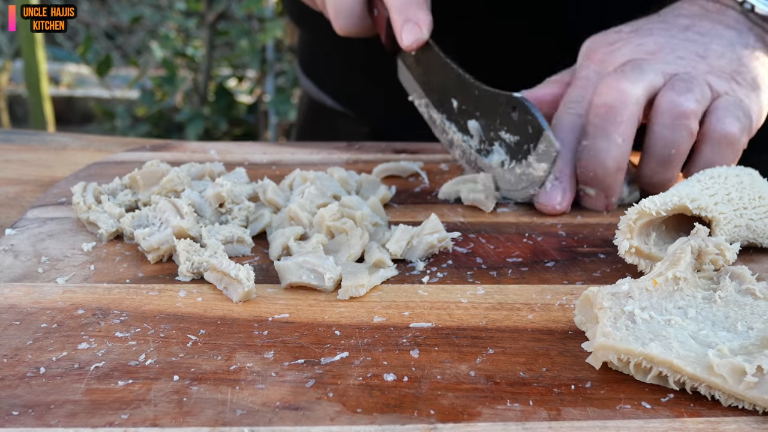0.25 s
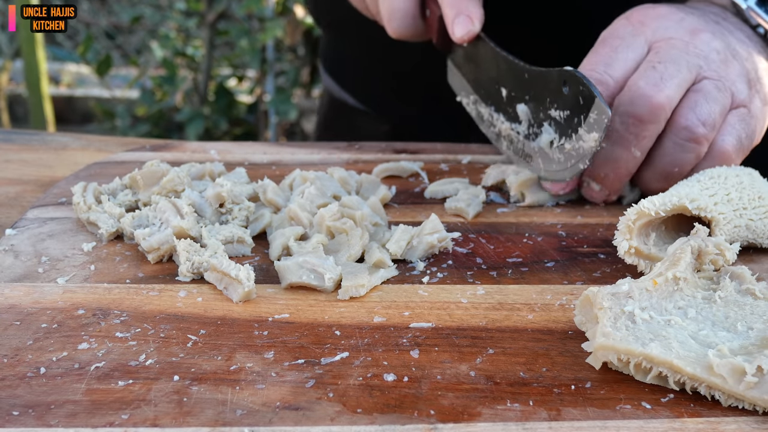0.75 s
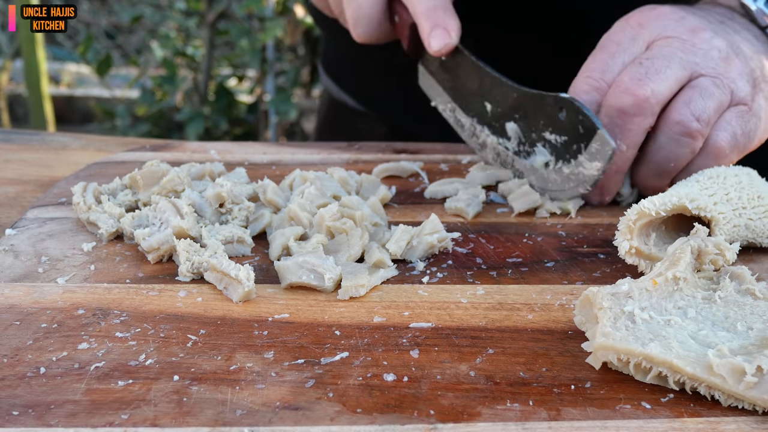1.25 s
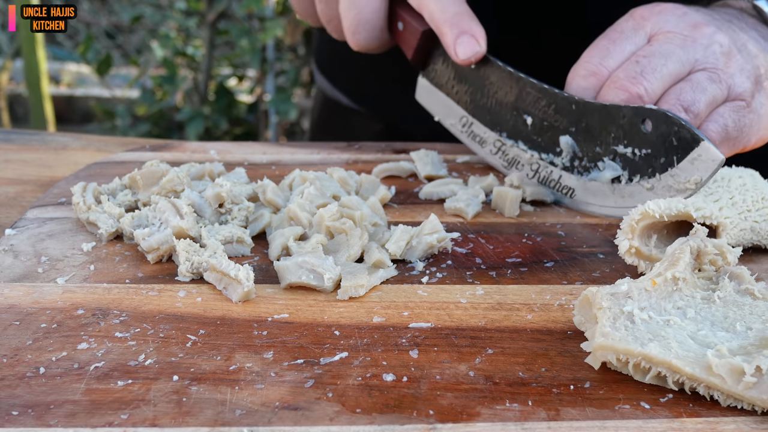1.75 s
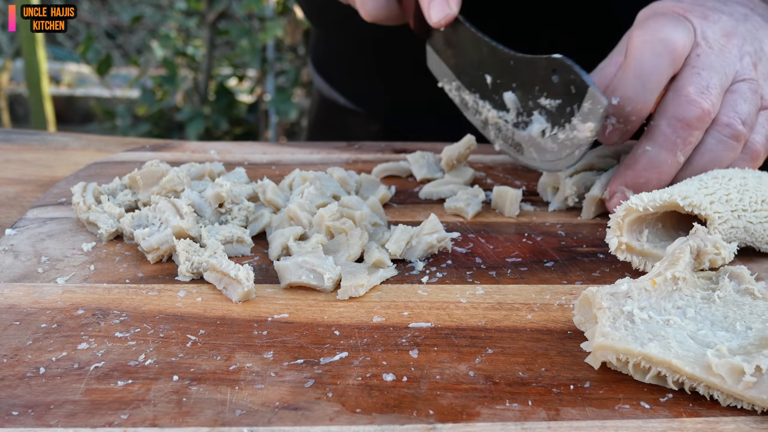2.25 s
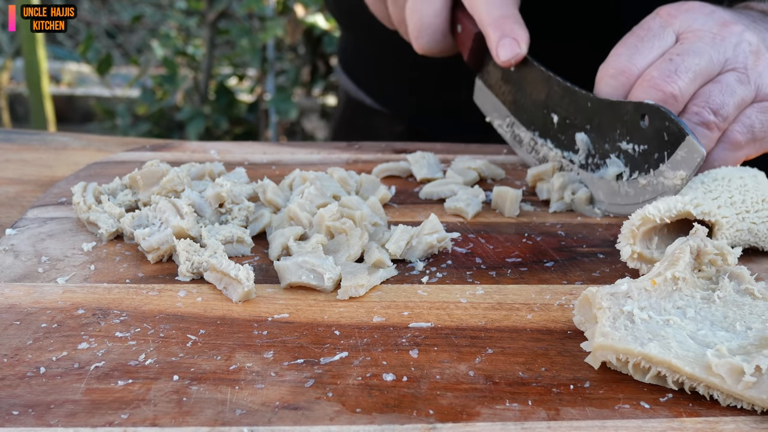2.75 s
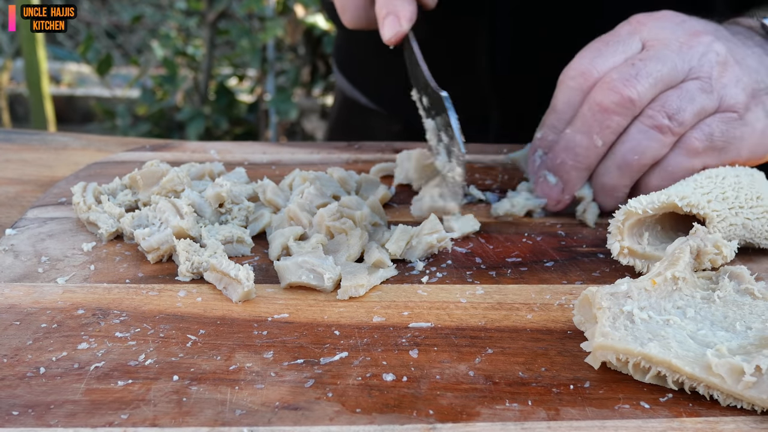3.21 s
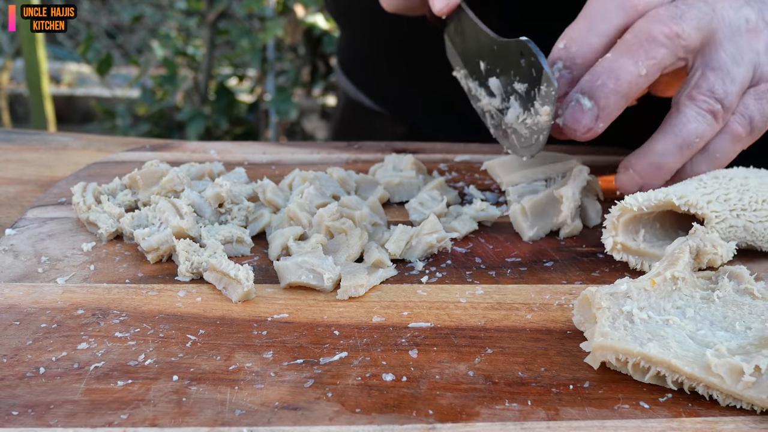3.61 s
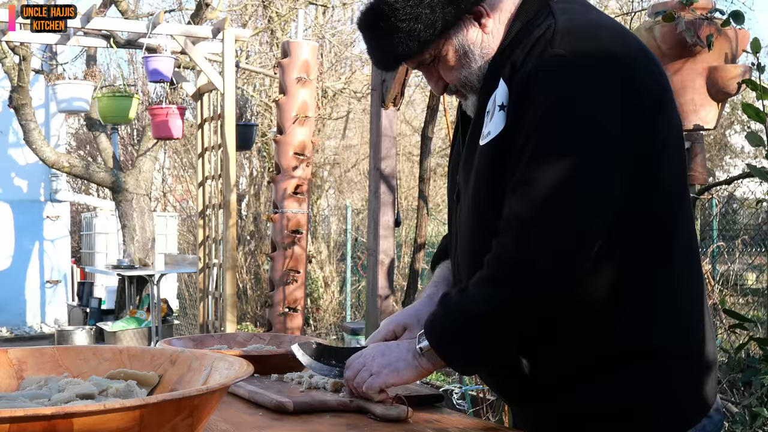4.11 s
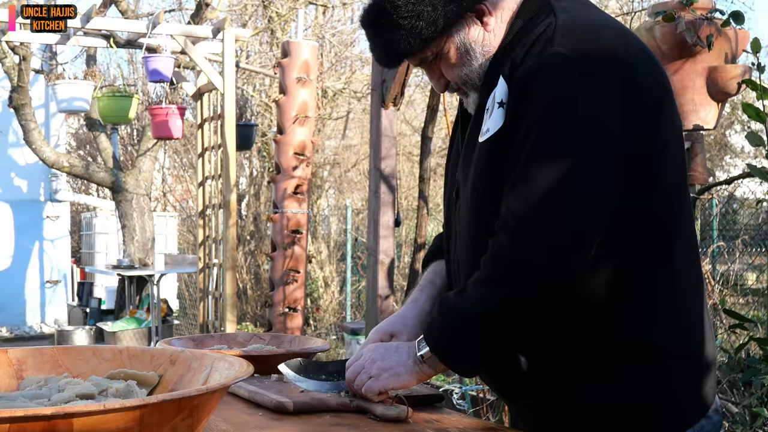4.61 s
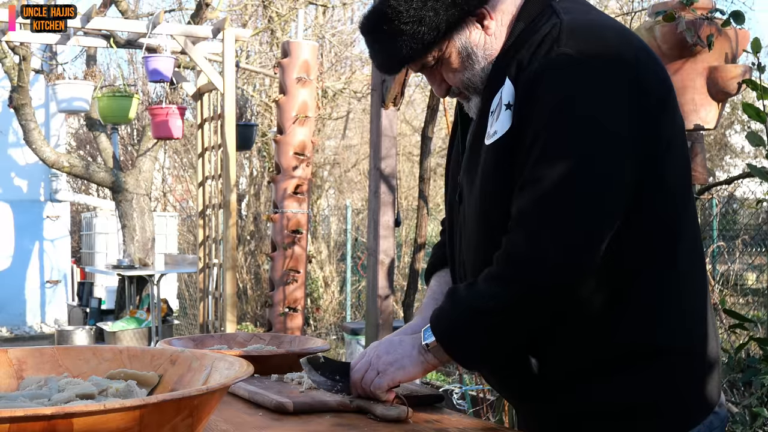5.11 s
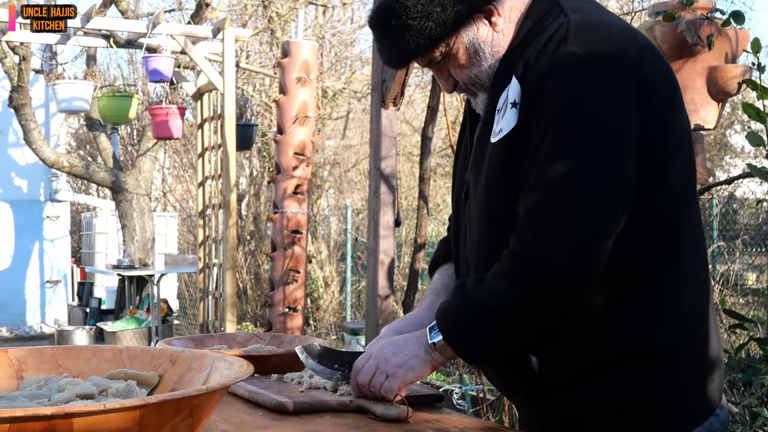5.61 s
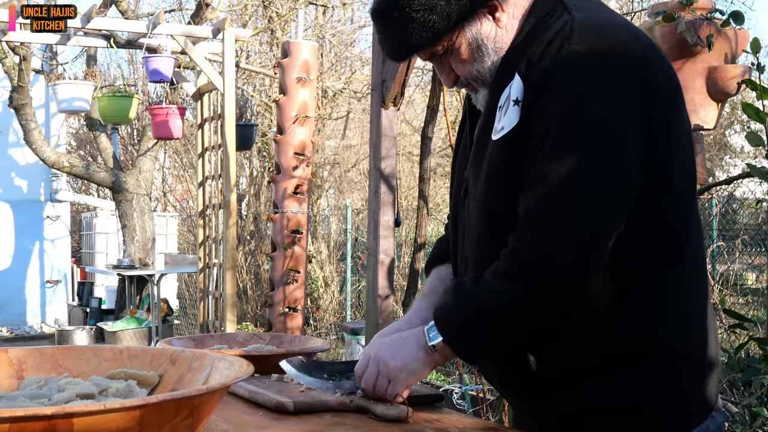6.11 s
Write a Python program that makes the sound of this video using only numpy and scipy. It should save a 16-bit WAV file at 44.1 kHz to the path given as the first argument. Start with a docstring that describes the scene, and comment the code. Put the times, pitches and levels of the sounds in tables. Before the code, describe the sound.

A soft rush of open air with a thin hiss runs throughout. At about 0.3 seconds a knife scrapes faintly on a wooden board, close by. The heavy blade then chops through wet tripe, each cut ending in a short wooden knock, at 1.0, 1.9 and 2.8 seconds, the third the loudest. Between cuts the edge drags quietly across the wood with a faint steel ring, around 1.4, 2.0 and 3.1 seconds. Small wet ticks of unsticking meat come from 2.5 to 4.1 seconds, clearest at 3.0. From about 4.1 seconds the work is heard from a step away, narrower and with a slight dull echo. More knocks land at 4.5 and 5.2 seconds, then a light tap at 5.8 and a firm chop just before 6.0, with brief scrapes between. A faint, low distant rush swells from 5 seconds and peaks around 6.1.

```python
"""First comes the soft rush of open air and a faint scrape of a knife on a wooden board.
Then the heavy knife chops tripe on a garden table, and each cut ends in a knock of the board.
Between cuts the blade scrapes the pieces aside and rings faintly, and wet meat ticks as it unsticks.
We listen from close by, then from a step away, where a low distant rush swells."""
import sys
import numpy as np
from scipy import signal
from scipy.fft import rfft, irfft, next_fast_len
from scipy.io import wavfile
from scipy.ndimage import uniform_filter1d

SR = 44100
rng = np.random.default_rng(int(sys.argv[2]) if len(sys.argv) > 2 else 0)


def log_audio(samples):
    """Write samples as a 16-bit WAV file to the path given in sys.argv[1]."""
    # one column per channel
    frames = np.atleast_2d(samples).T
    # limit to full scale, then quantise
    limited = np.clip(frames, -1, 1)
    pcm = np.round(limited * 32767).astype(np.int16)
    wavfile.write(sys.argv[1], SR, pcm)


N = 280035
T = np.arange(N) / SR
STEP_BACK_S = 4.12  # from here on the listener is a step away
IS_CLOSE = T < STEP_BACK_S


def place(s):
    """Pick from a (close, far) pair of settings: 0 before the step back, then 1."""
    return int(s >= STEP_BACK_S)


def undb(db):
    """Turn decibels into a gain."""
    return 10 ** (np.asarray(db) / 20)


def unit(x):
    """Scale to an average (rms) level of 1."""
    return x / np.sqrt(np.mean(x ** 2))


def add(out, x, s):
    """Mix x into out, starting at s seconds."""
    i = int(round(s * SR))
    out[i:i + len(x)] += x[:len(out) - i]


def shape(x, points):
    """Filter along a curve of (pitch_hz, gain_db) points."""
    hz, db = np.transpose(points)
    size = next_fast_len(len(x))
    bins_hz = np.maximum(np.fft.rfftfreq(size, 1 / SR), 1)
    gain = undb(np.interp(np.log(bins_hz), np.log(hz), db))
    return irfft(rfft(x, size) * gain, size)[:len(x)]


def colour(x, points):
    """Filter along a curve, then scale to level 1."""
    return unit(shape(x, points))


def band(x, low_hz, high_hz, order=2):
    """Keep the sound between two pitches."""
    return signal.sosfilt(signal.butter(order, [low_hz, high_hz], "band", fs=SR, output="sos"), x)


def resonate(x, hz, width_hz):
    """Let x ring at one note."""
    for width in (width_hz, 6 * width_hz):
        x = signal.lfilter(*signal.iirpeak(hz, hz / width, fs=SR), x)
    return x


def snap(t, decay_s, low_hz, high_hz):
    """A tiny burst of noise with peak 1."""
    x = band(rng.standard_normal(len(t)) * np.exp(-t / decay_s), low_hz, high_hz, order=3)
    return x / np.abs(x).max()


def slips(spread_db):
    """Surfaces catch and let go, making many clicks of uneven size."""
    clicks = rng.standard_normal(N) * undb(spread_db * rng.exponential(size=N).clip(0, 5))
    return unit(clicks * (rng.random(N) < .2))


# Tone of the air that both ears share: pitch_hz, gain_db
AIR_TONE_CLOSE = [(25, -51), (60, -40), (110, -21), (170, -11.5), (280, -2.5), (430, 2.5), (700, 0.5),
                  (1100, 0), (1600, -7.5), (2300, -18.5), (5400, -26.5), (6900, -19), (10000, -22.5),
                  (14000, -18.5)]
AIR_TONE_FAR = [(25, -28.5), (90, -20.5), (170, -18.5), (280, -9), (440, 4.5), (650, -4.5), (1000, -6),
                (1600, -16.5), (2300, -26.5), (3700, -25.5), (5400, -28.5), (6900, -21.5), (10000, -28.5),
                (14000, -23.5)]
# Tone of the hiss that differs left and right: pitch_hz, gain_db
HISS_TONE_CLOSE = [(43, -19), (130, 1), (500, 5.5), (1000, 9), (2600, -2), (4500, -3.5), (7300, 3.5),
                   (10000, 0.5), (14000, 4)]
HISS_TONE_FAR = [(43, -16), (130, -1.5), (250, -7), (600, -7), (2600, -14), (4000, -19), (7000, 7),
                 (10000, -1), (14000, 2.5)]

def air(close_db=-66, far_db=-64.5, hiss_close_db=-79.5, hiss_far_db=-79):
    """Open air rushes softly in the middle, with a thin hiss to the sides."""
    rush, hiss = rng.standard_normal((2, N))
    middle = np.where(IS_CLOSE, undb(close_db) * colour(rush, AIR_TONE_CLOSE),
                      undb(far_db) * colour(rush, AIR_TONE_FAR))
    side = np.where(IS_CLOSE, undb(hiss_close_db) * colour(hiss, HISS_TONE_CLOSE),
                    undb(hiss_far_db) * colour(hiss, HISS_TONE_FAR))
    return middle + np.array([side, -side])


# How the distant rush swells: time_s, level_db
RUSH_SWELL = [(4.2, -87.5), (5.1, -75), (5.45, -72), (5.8, -62.5), (6.1, -59.5), (6.35, -65.5)]
# Its tone: pitch_hz, gain_db
RUSH_TONE = [(60, -42.5), (150, -16), (270, -2), (450, -2), (650, -14), (1500, -26), (4000, -51.5)]

def distant_rush():
    """A low, faraway rush grows near the end."""
    level_db = np.interp(T, *np.transpose(RUSH_SWELL))
    return undb(level_db) * colour(rng.standard_normal(N), RUSH_TONE)


def garden_echo(x, fade_s=0.18, delay_s=0.0023):
    """Table, walls and fence throw back a short, dull echo."""
    t = T[:SR // 2]
    tail = band(rng.standard_normal(len(t)), 300, 1500)
    tail *= np.exp(-np.log(1000) * t / fade_s) * (t > delay_s)
    return signal.fftconvolve(x, tail / np.sqrt(np.sum(tail ** 2)))[:N]


# How much of the knife's sound differs left and right: pitch_hz, gain_db
KNIFE_WIDTH = [(100, -7), (500, -28), (1000, -25), (1700, -26.5), (2600, -21), (4000, -12.5), (7000, -10.5),
               (13000, -16.5)]

def stereo_width(hits, scraping, scrape_db=2, far_db=-18.5):
    """Each ear gets a slightly different sound; from a step away the knife seems narrower."""
    out_of_phase = signal.hilbert(hits, next_fast_len(N)).imag[:N]
    side = shape(out_of_phase + undb(scrape_db) * scraping, KNIFE_WIDTH)
    side *= undb(np.where(IS_CLOSE, 0, far_db))
    return np.array([side, -side])


# Tone of fine grit: pitch_hz, gain_db
GRIT_TONE = [(500, -24), (2000, -5), (3000, 0), (4400, -1), (5700, -7), (6900, 4.5), (8000, -5.5),
             (10000, -8.5), (16000, -8.5)]

def grit(x):
    """The bright, grainy sound in crackles, scrapes and squishes."""
    return colour(x, GRIT_TONE)


# The clearest wet ticks: start_s, peak_db
WET_TICKS = [(2.468, -58), (2.648, -55), (2.724, -52), (2.772, -54.5), (3.026, -41), (3.593, -57.5),
             (4.108, -55.5)]

def wet_ticks(faint_db=-70, range_db=8, faint_count=70, crackle_db=-82, patchy_db=4):
    """Moist meat unsticks from blade and fingers; faint ticks and crackle are only heard close by."""
    out, t = np.zeros(N), T[:SR // 50]
    for start_s, peak_db in WET_TICKS:
        add(out, undb(peak_db) * snap(t, 0.003, 5800, 17000), start_s)
    for when, size in rng.random((faint_count, 2)):
        add(out, undb(faint_db + range_db * size) * snap(t, 0.0015, 5100, 15000), when * STEP_BACK_S)
    handling = undb(patchy_db * unit(uniform_filter1d(rng.standard_normal(N), size=4000)))
    return out + undb(crackle_db) * handling * grit(slips(spread_db=4)) * IS_CLOSE


# Notes of the steel blade: pitch_hz, width_hz, gain_db
BLADE_NOTES = [(1331, 33, 11), (2148, 18, 4.5), (2593, 62, -1.5), (3250, 27, -10.5), (4450, 150, -8),
               (5220, 89, -2.5), (6580, 16, 5), (7850, 46, 3.5), (9100, 120, -4.5), (10540, 330, -9),
               (12000, 37, -7), (13200, 50, -9), (14600, 120, -23)]

def blade_ring(friction, vary_db=4, detune=0.0068):
    """Each stroke presses another part of the edge, so the steel's notes shift in level and pitch."""
    steel = np.zeros(len(friction))
    for hz, width_hz, db in BLADE_NOTES:
        size, shift = rng.standard_normal(2)
        steel += undb(db + vary_db * size) * resonate(friction, hz * (1 + detune * shift), width_hz)
    return unit(steel)


# Notes of the rubbed board: pitch_hz, width_hz, close_db, far_db
RUBBED_NOTES = [(746, 40, -15, -11.5), (758, 26, -23.5, -2), (1076, 64, -9, 8), (1362, 42, -11, -16.5),
                (1637, 80, -16, -6), (2207, 32, -25.5, -10), (2590, 133, -9, -31), (2870, 140, -18.5, -10),
                (4190, 150, -17.5, -22)]

def rubbed_wood(friction, spot_hz, far, boost_db=(11.5, 0.5), reach_octaves=0.2):
    """Rubbing makes the board ring, and boosts notes near the rubbed spot's own pitch."""
    wood = np.zeros(len(friction))
    for hz, width_hz, *note_db in RUBBED_NOTES:
        nearness = np.exp(-(np.log2(hz / spot_hz) / reach_octaves) ** 2)
        wood += undb(note_db[far] + boost_db[far] * nearness) * unit(resonate(friction, hz, width_hz))
    return wood


# Tone of the edge dragging on wood: pitch_hz, gain_db
DRAG_TONE = [(150, -39.5), (400, -4.5), (750, 7), (900, 2.5), (1350, 5), (1680, 6.5), (1900, -7.5),
             (2250, -5), (2650, -8.5), (3000, -30), (6000, -46), (16000, -55)]
# Strokes across the board: loudest_s, length_s, gain_db, grit_db, spot_pitch_hz
STROKES = [(0.253, 0.2, -54.5, -7, 1650), (0.357, 0.034, -61.5, -12, 1530), (1.150, 0.18, -61, 1, 1080),
           (1.35, 0.16, -50, -15.5, 810), (1.425, 0.036, -49.5, -6, 1040), (2.02, 0.18, -55, -10, 1360),
           (2.025, 0.066, -54.5, -34, 744), (2.096, 0.0093, -62.5, -19, 2630),
           (3.009, 0.14, -58.5, 0.5, 745), (3.069, 0.095, -63.5, -12, 4280),
           (3.184, 0.051, -54.5, -4, 2660), (3.233, 0.058, -51, -2, 1360), (4.626, 0.21, -78, 6, 2220),
           (4.708, 0.035, -55.5, -16, 770), (5.451, 0.049, -57, -23, 1080), (6.173, 0.049, -54, -2.5, 1090)]

def scrapes(rough_db=2, judder_db=-0.5, drag_db=(-1, -16), steel_db=(1.5, -6), flick_s=0.031):
    """The edge drags on wood: a quick flick lets the steel ring, a long stroke swells and muffles it."""
    drag = colour(slips(rough_db), DRAG_TONE)
    grains = grit(slips(rough_db))
    friction = slips(rough_db)
    judder = undb(judder_db * unit(band(rng.standard_normal(N), 30, 130)))
    out = np.zeros(N)
    for loudest_s, length_s, gain_db, grit_db, spot_hz in STROKES:
        far = place(loudest_s)
        rise_s = min(0.011 * (length_s / flick_s) ** 1.223, .8 * length_s)
        fall_s = length_s - rise_s
        span = slice(max(int((loudest_s - 4 * rise_s) * SR), 0), int((loudest_s + 5 * fall_s) * SR))
        t = T[span] - loudest_s
        pressure = judder[span] / np.cosh(2.436 * t / np.where(t < 0, rise_s, fall_s))
        wood = undb(drag_db[far]) * drag[span] + rubbed_wood(friction[span], spot_hz, far)
        muffle_db = 5 * np.log2(length_s / flick_s)
        steel = undb(steel_db[far] - muffle_db) * blade_ring(friction[span])
        out[span] += undb(gain_db) * pressure * (wood + undb(grit_db) * grains[span] + steel)
    return out


# Notes of the struck board: pitch_hz, fade_s (time to drop 60 dB), close_db, far_db
BOARD_NOTES = [(302, 0.24, -11.5, -13.5), (368, 0.2, -20, -10.5), (456, 0.084, 8.5, -24),
               (511.6, 0.035, -29.5, 10), (593, 0.04, 19, 5), (756, 0.13, -2, -10.5), (800, 0.045, 18.5, 7),
               (915, 0.066, 7, -15), (977, 0.091, 10, -16.5), (1136, 0.067, 7, -4), (1344, 0.043, 10.5, -1),
               (1450, 0.067, -13.5, -34), (1680, 0.041, -20.5, 7.5), (1897, 0.055, -38, -3.5),
               (2030, 0.043, -12, -19), (2496, 0.015, 13.5, -28), (3220, 0.035, 9.5, -6)]

def board_tap(t, far, shove_hz=(740, 938), shove_s=(0.0012, 0.00049), shove_db=(19.5, 25)):
    """A tap shoves the whole board, then its notes ring out."""
    hz, fade_s, *note_db = np.transpose(BOARD_NOTES)
    notes = np.exp(-np.log(1000) * t / fade_s[:, None]) * np.cos(2 * np.pi * hz[:, None] * t)
    age = t / shove_s[far]
    shove = age ** 2 * np.exp(-age) * np.cos(2 * np.pi * shove_hz[far] * t)
    return undb(note_db[far]) @ notes + undb(shove_db[far]) * shove


def meat_cushion(x, low_hz, high_hz, cushion_s):
    """A blow through meat is rounded off and has little bass or treble."""
    x = signal.sosfilt(signal.butter(2, low_hz, "high", fs=SR, output="sos"), x)
    x = signal.sosfilt(signal.butter(3, high_hz, "low", fs=SR, output="sos"), x)
    return np.convolve(x, signal.windows.gaussian(41, cushion_s * SR))[:len(x)]


# Knife blows; each lands three times (first touch, rest of the curved edge, bounce):
# start_s, gain_db, low_hz, high_hz, second_delay_s, second_gain, bounce_delay_s
KNIFE_BLOWS = [(0.977, -28, 570, 1240, 0.0018, 5, 0.0063), (1.860, -23.5, 710, 760, 0.0044, 0.1, 0.017),
               (2.815, -16, 653, 1195, 0.0016, 4.5, 0.0081), (4.487, -23.5, 790, 880, 0.0019, 4.6, 0.0085),
               (5.196, -26, 530, 840, 0.00398, 0.3, 0.018), (5.7857, -41, 202, 2200, 0.0017, 1.5, 0.014),
               (5.9535, -20.5, 753, 1066, 0.0021, 5.3, 0.0072)]

def chops(cushion_s=(.00004, .00011), bounce=0.096, firm_db=-22, rattle_db=-19, thud_db=-49,
          squish_db=(-46, -53.5), tick_db=(-28.5, -35.5), crush_db=-21):
    """The edge crushes through the meat, lands on the board and bounces; juice squishes out."""
    out, t = np.zeros(N), T[:SR // 3]
    for start_s, gain_db, low_hz, high_hz, second_s, second_gain, bounce_s in KNIFE_BLOWS:
        far, force_db = place(start_s), gain_db - firm_db
        ring = meat_cushion(board_tap(t, far), low_hz, high_hz, cushion_s[far])
        knock = ring.copy()
        add(knock, second_gain * ring, second_s)
        add(knock, bounce * (1 + second_gain) * ring, bounce_s)
        knock /= np.sqrt(np.sum(knock ** 2) / (SR / 100))  # as much energy as 10 ms at level 1
        noise = rng.standard_normal((4, len(t)))
        # the table shudders; its thud grows more slowly than the blow
        rattle = unit(band(noise[0], 380, 1200, order=3)) * np.exp(-t / 0.016)
        thud = unit(band(noise[1], 15, 170, order=1)) * np.exp(-t / 0.015)
        knock += undb(rattle_db) * rattle + undb(thud_db - .5 * force_db) * thud
        knock += undb(squish_db[far]) * grit(noise[2]) / np.cosh((t - .018) / 0.013)
        # the harder the blow, the more the bare edge ticks on the wood
        add(knock, undb(tick_db[far] + 1.4 * force_db) * snap(t, 0.00099, 2100, 7500), .001)
        add(out, undb(gain_db) * knock, start_s)
        # fibres tear, loudest just as the edge lands
        crush = unit(band(noise[3], 490, 1200, order=3)) * np.exp(-abs(t - t.mean()) / 0.0071)
        add(out, undb(gain_db + crush_db) * crush, start_s - t.mean())
    return out


def scene(echo_close_db=-32, echo_far_db=-22):
    """The knife works in the middle of the open air; from a step away there is more echo."""
    hits = chops() + wet_ticks()
    knife = hits + scrapes()
    sides = stereo_width(hits, scrapes())  # same strokes, fresh friction noise
    echo = garden_echo(knife * undb(np.where(IS_CLOSE, echo_close_db, echo_far_db)))
    return knife + echo + sides + air() + distant_rush()


def record(dry, top_hz=15800):
    """Cut off the highest treble steeply."""
    return signal.sosfilt(signal.ellip(10, .1, 70, top_hz, fs=SR, output="sos"), dry)


dry = scene()
out = record(dry)
log_audio(out)
```